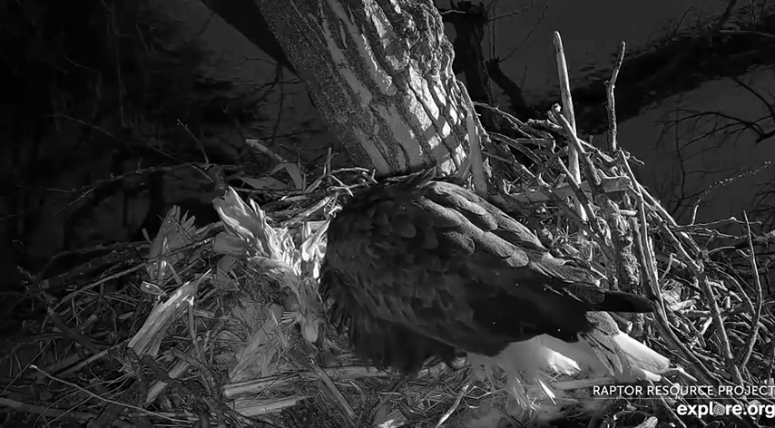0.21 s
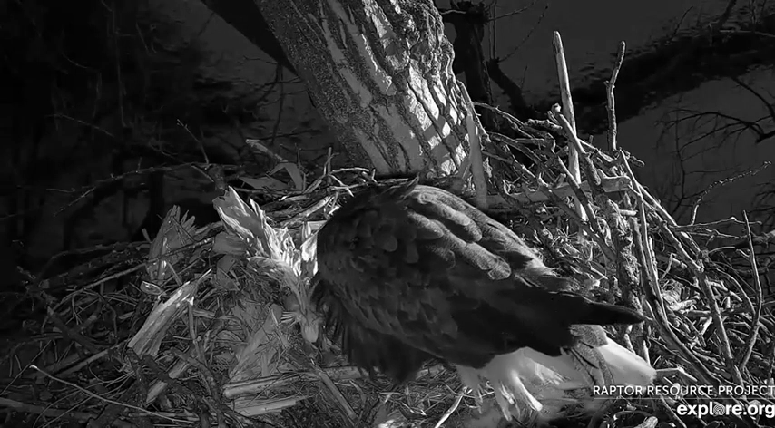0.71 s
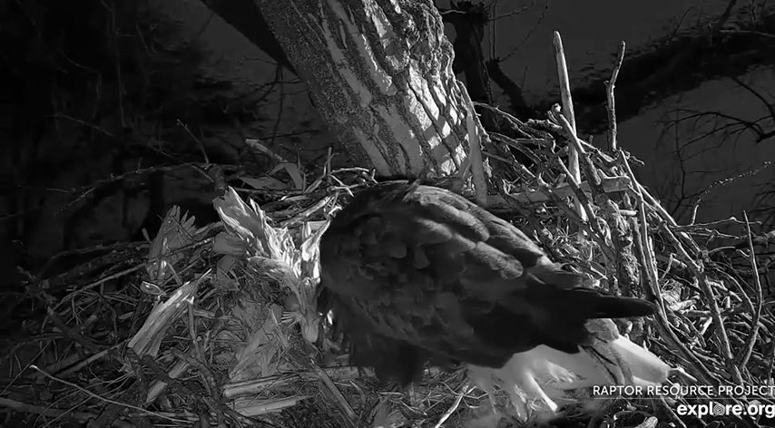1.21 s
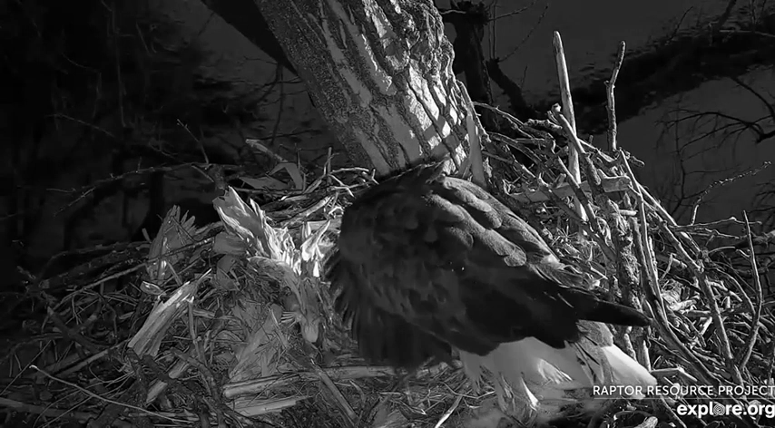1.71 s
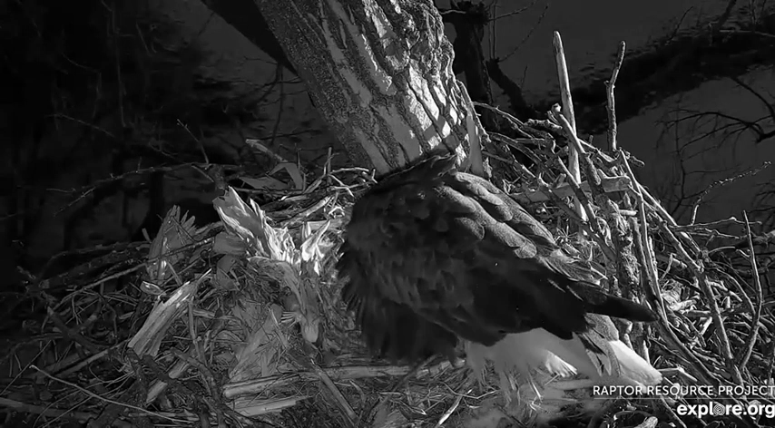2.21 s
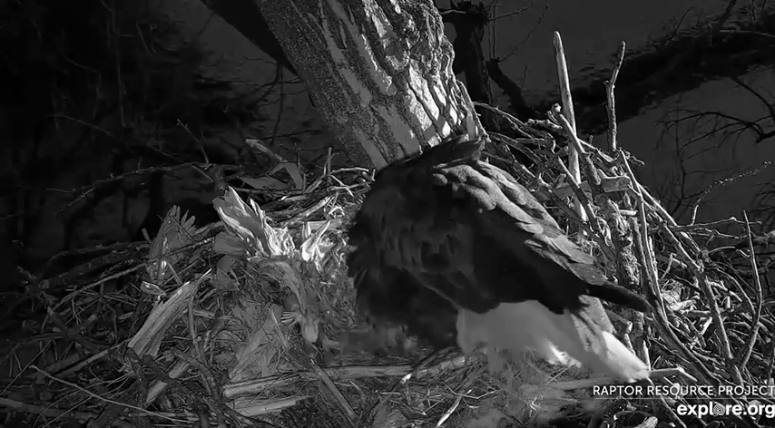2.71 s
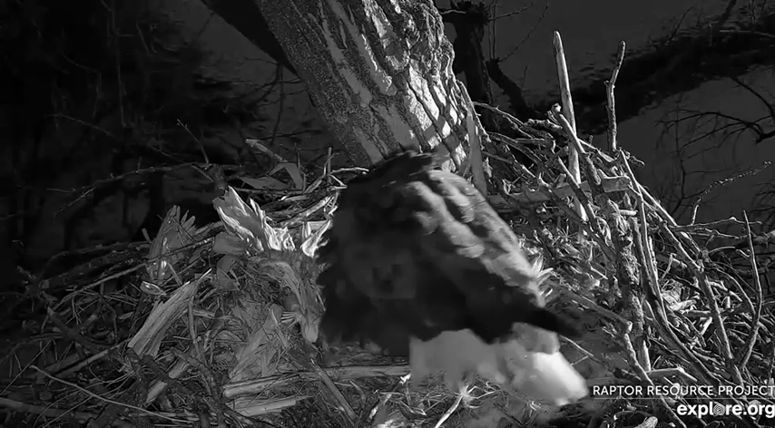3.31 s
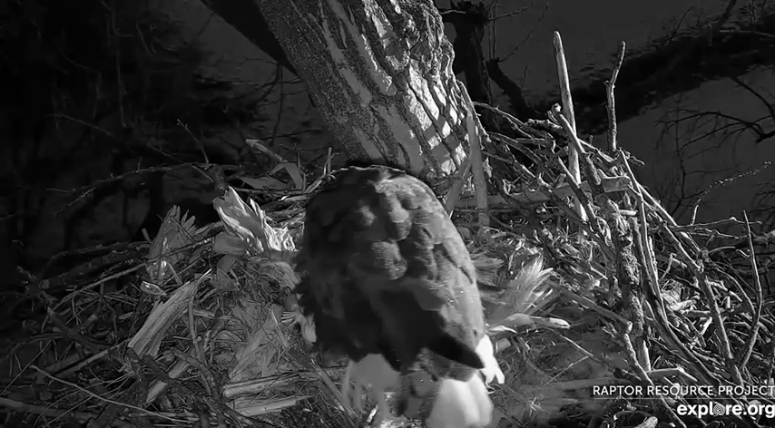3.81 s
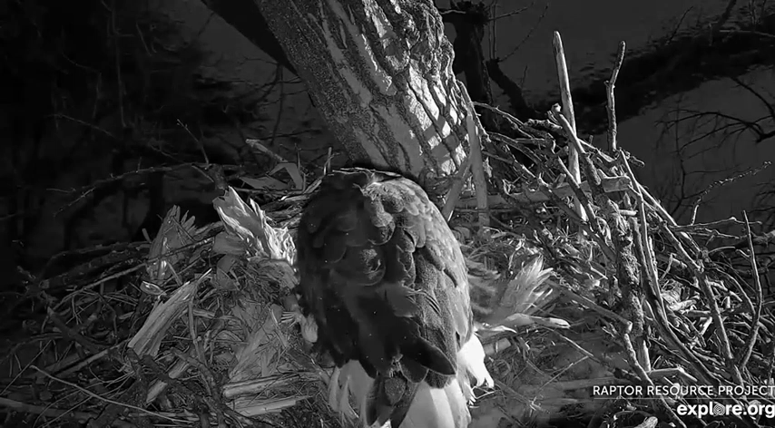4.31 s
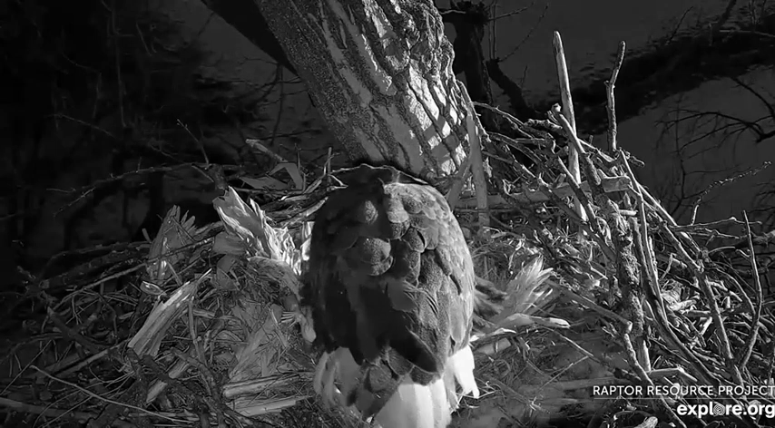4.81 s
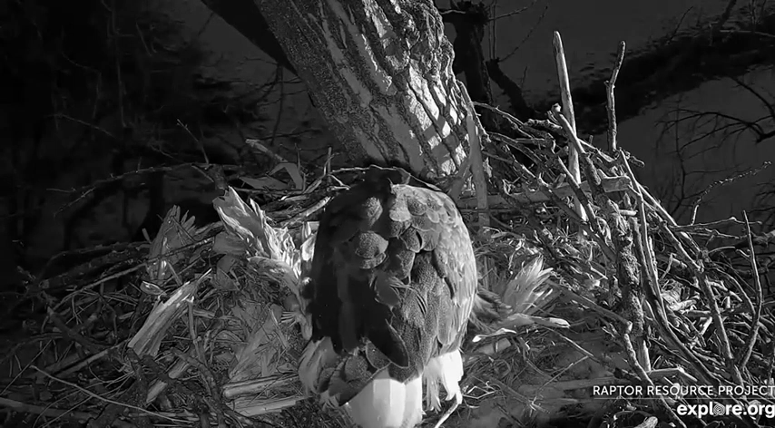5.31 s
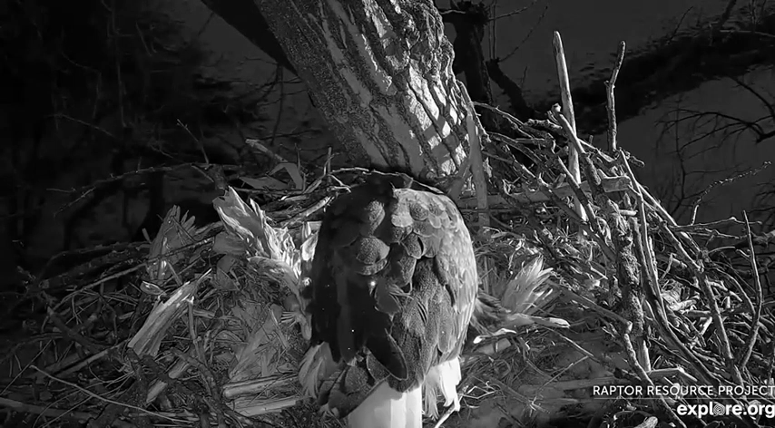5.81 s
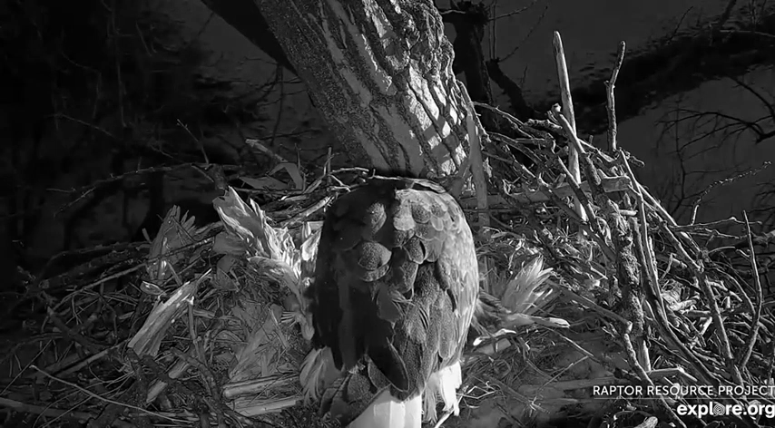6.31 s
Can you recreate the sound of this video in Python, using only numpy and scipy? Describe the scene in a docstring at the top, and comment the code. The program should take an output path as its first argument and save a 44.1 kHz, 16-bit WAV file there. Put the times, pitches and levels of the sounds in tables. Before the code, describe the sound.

A close eagle chitters in four bursts of high whistles, rasping squeals and falling yelps over steadily rushing water.

```python
"""An eagle chitters close by in four bursts of whistles, rasping squeals and falling yelps.
Its syrinx whistles, slapping membranes chop the tone and breath hisses through the windpipe.
The trees echo each note and running water rushes steadily below. Feathers flutter once, a twig
snaps and a foot thuds as the bird shifts on its nest; a small bird whistles far off."""
import sys
import numpy as np
from scipy import signal
from scipy.fft import rfft, irfft, next_fast_len
from scipy.io import wavfile
from scipy.ndimage import uniform_filter1d, map_coordinates

SR = 44100
rng = np.random.default_rng(int(sys.argv[2]) if len(sys.argv) > 2 else 0)


def generate_wav(sig):
    """Save sig (samples, or channels by samples) to the path in sys.argv[1] as 16-bit PCM at SR."""
    pcm = np.round(np.clip(np.atleast_2d(sig).T, -1, 1) * 32767).astype(np.int16)
    wavfile.write(sys.argv[1], SR, pcm)


N = 289737

CLEARING = 0.88  # share of rasp lost at full effort


def amp(db):
    """Decibels to gain."""
    return 10 ** (np.asarray(db) / 20)


def unit(x):
    """x at rms 1."""
    return x / np.sqrt(np.mean(x ** 2) + 1e-20)


def along(points, hz):
    """(hz, value) points read on a log frequency axis."""
    knots_hz, values = np.transpose(points)
    return np.interp(np.log(hz + 1), np.log(knots_hz + 1), values)


def wobble(rate_hz, size=N):
    """Smooth random curve, rate_hz knots a second."""
    knots = rng.standard_normal(int(size * rate_hz / SR) + 4)
    return map_coordinates(knots, [np.arange(size) * rate_hz / SR])


def filtered(x, response):
    """x through a frequency response."""
    size = next_fast_len(len(x) + 8192)
    return irfft(rfft(x, size) * response(np.fft.rfftfreq(size, 1 / SR)), size)[:len(x)]


def noise(spectrum, size=N):
    """Coloured noise, rms 1."""
    return unit(filtered(rng.standard_normal(size), lambda hz: amp(along(spectrum, hz))))


def add(track, start_s, sound):
    """Mix a sound into the track."""
    start = round(start_s * SR)
    part = sound[max(-start, 0):max(N - start, 0)]
    track[max(start, 0):][:len(part)] += part


def swell(t, at_s, half_width_s):
    """Round-topped bump, 0 to 1 and back."""
    return np.exp(-np.abs((t - at_s) / half_width_s) ** 3)


def ease(t, start_s, length_s):
    """Smooth step, 0 to 1."""
    return np.sin(np.pi / 2 * np.clip((t - start_s) / length_s, 0, 1)) ** 2


def water(level_db=-33, patchy_db=1.9):
    """Steady rush; its colour shifts in small patches as the current churns."""
    # rush spectrum: freq_hz, gain_db
    spectrum = [(15, -61), (25, -31), (64, -2), (96, -7.5), (173, -3.5), (303, -5.5), (371, -4), (757, 1),
                (1470, -4.5), (1890, -11.5), (3490, -23), (4620, -31.5), (5810, -38), (9660, -34),
                (11000, -50), (14300, -94), (22000, -120)]
    bins = signal.stft(noise(spectrum), nperseg=512)[2]
    patches = uniform_filter1d(rng.standard_normal(bins.shape), size=4, axis=0)
    patches = uniform_filter1d(patches, size=10, axis=1)
    rush = signal.istft(bins * amp(patchy_db * unit(patches)), nperseg=512)[1][:N]
    return amp(level_db) * unit(rush)


def woods(x, near_db=-15, near_t60_s=0.11, far_db=-17):
    """Quick scatter from trunk and nest, then a long tail from the trees."""
    # decay among the trees: freq_hz, t60_s
    decay = [(300, 0.58), (3300, 0.71), (6000, 0.49), (10000, 0.1)]
    hz, t, bins = signal.stft(rng.standard_normal(SR), SR, nperseg=256)
    far = signal.istft(bins * amp(-60 * t / along(decay, hz)[:, None]), SR, nperseg=256)[1][:SR]
    near = rng.standard_normal(SR) * amp(-60 * np.arange(SR) / SR / near_t60_s)
    echo = amp(near_db) * near / np.linalg.norm(near) + amp(far_db) * far / np.linalg.norm(far)
    return signal.fftconvolve(x, np.pad(echo, (SR // 200, 0)))[:N]


def far_bird():
    """Thin falling whistles, blurred by distance."""
    # chirps: start_s, length_s, from_hz, to_hz, level_db
    chirps = [(-.02, 0.06, 4100, 2860, -45), (1.278, 0.013, 2860, 2300, -40),
              (5.213, 0.059, 3830, 2850, -41.5), (5.728, 0.052, 3940, 2870, -44),
              (5.918, 0.055, 4220, 3050, -48.5)]
    out = np.zeros(N)
    for start_s, length_s, from_hz, to_hz, level_db in chirps:
        u = np.linspace(0, 1, int(length_s * SR))
        phase = 2 * np.pi * np.cumsum(from_hz * (to_hz / from_hz) ** u) / SR
        flicker_db = 3 * wobble(144, len(u))
        tone = np.sin(phase + 0.9 * wobble(396, len(u)))
        add(out, start_s, amp(level_db + flicker_db) * np.sin(np.pi * u) * tone)
    return out


def nest(snap_t60_s=0.015):
    """Straw crackles and a twig snaps underfoot."""
    # straw and twig spectrum: freq_hz, gain_db
    straw = [(1000, -12), (3500, 2.5), (5500, 7), (8500, -1.5), (11000, -18)]
    # rustle envelope: time_s, level_db
    rustle = [(2.2, -54.5), (2.72, -53.5), (2.82, -46.5), (2.93, -54), (3.4, -55)]
    # twig snap: start_s, level_db
    snaps = [(2.742, -27.5)]
    rustle_db = np.interp(np.arange(N) / SR, *np.transpose(rustle))
    out = amp(rustle_db) * unit(noise(straw) * amp(3.4 * wobble(300)))
    t = np.arange(SR // 20) / SR
    for start_s, level_db in snaps:
        add(out, start_s, amp(level_db - 60 * t / snap_t60_s) * noise(straw, len(t)))
    return out


def footfall(rise_s=0.011):
    """The packed nest thuds dully under a foot."""
    # thud: start_s, pitch_hz, level_db
    thuds = [(4.451, 309, -28)]
    out, t = np.zeros(N), np.arange(SR // 8) / SR
    envelope = t / rise_s * np.exp(1 - t / rise_s)
    for start_s, pitch_hz, level_db in thuds:
        tone = np.sin(2 * np.pi * pitch_hz * t + wobble(146, len(t)))
        add(out, start_s, amp(level_db) * envelope * tone)
    return out


def feathers(start_s=1.716, flicks=8, gap_s=0.0102, scatter_s=0.00092, puff_s=0.0024):
    """Quick run of flicks that swells and fades, each a puff of air."""
    # puff spectrum: freq_hz, gain_db
    spectrum = [(30, -22), (100, -1), (330, 17), (700, -12), (1800, -4), (3200, 0.5), (5000, -6.5),
                (10000, -33)]
    out, t = np.zeros(N), np.arange(SR // 50) / SR
    envelope = t / puff_s * np.exp(-2 * t / puff_s)
    for k, u in enumerate(np.linspace(0, 1, flicks)):
        level_db = -30.5 + 3.5 * np.sin(np.pi * u) - 8 * u
        at_s = start_s + k * gap_s + scatter_s * rng.standard_normal()
        add(out, at_s, amp(level_db) * unit(envelope * noise(spectrum, len(t))))
    return out


def windpipe(hz):
    """Complex response of the eagle's airway."""
    # airway resonances: centre_hz, width_hz, gain_db
    resonances = [(1950, 320, 6), (3370, 170, 5), (4310, 118, 14), (5300, 1600, 1), (5950, 210, 9),
                  (7340, 380, -3), (8700, 1300, -16)]
    response = 0
    for k, (centre_hz, width_hz, gain_db) in enumerate(resonances):
        damping = 1j * hz * width_hz
        response += (-1) ** k * amp(gain_db) * damping / (centre_hz ** 2 - hz ** 2 + damping)
    return response


def membrane_slap(depth, slap_hz=305.2, scatter=0.26):
    """Gain of membranes slapping shut unevenly; mean power unchanged."""
    rate_hz = slap_hz * (1 + scatter * wobble(slap_hz, len(depth)))
    return np.exp(depth * np.cos(2 * np.pi * np.cumsum(rate_hz) / SR)) / np.sqrt(np.i0(2 * depth))


def syrinx(pitch_hz, strength, rasp, edge_s=0.0013, rattle_hz=650, rattle_db=4, buzz_hz=860,
           throat_hz=7000):
    """One note: tone, bare octave, hiss envelope. Rasp shakes the pitch and chops the tone."""
    size = len(pitch_hz)
    t = np.arange(size) / SR
    rasp = np.clip(rasp, 0, 1)
    loudness = strength * ease(np.minimum(t, t[-1] - t), 0, edge_s)
    stagger = 0.07 * rasp ** 2 * wobble(200, size)
    jitter = (0.0063 + 0.035 * rasp) * wobble(1330, size)
    hz = pitch_hz * (1 + stagger + jitter)
    phase = 2 * np.pi * np.cumsum(hz) / SR
    depth = np.log(amp(rattle_db)) * np.sqrt(rasp)
    rattle = np.exp(depth * np.clip(wobble(rattle_hz, size), -2, 1.8) - 2 * depth ** 2)
    # a slower membrane vibration adds flickering sidebands
    buzz_phase = 2 * np.pi * np.cumsum(buzz_hz * (1 + 0.092 * wobble(213.5, size))) / SR
    sidebands = np.zeros(size)
    for k, share in [(-1, 0.4), (1, 0.55), (2, 0.28)]:
        throat_gain = 1 / (1 + ((hz + k * buzz_hz) / throat_hz) ** 10)
        flicker = amp(5 * wobble(156, size))
        sidebands += share * throat_gain * flicker * np.sin(phase + k * buzz_phase)
    tone = (np.sin(phase) + rasp * sidebands) / np.sqrt(1 + (rasp / 2) ** 2)
    octave = np.sin(2 * phase)
    overtones = amp(-16) * octave + amp(-17) * np.sin(3 * phase) * (3 * hz < SR / 2)
    tone += loudness * overtones  # overtones grow with loudness
    envelope = np.sqrt(2) * loudness * rattle
    hiss_envelope = amp(-7) * loudness * (0.05 + rasp)
    return envelope * tone, envelope * octave, hiss_envelope


def undertones():
    """Low rough glides under or just before a note."""
    # glides: start_s, length_s, from_hz, to_hz, level_db, rasp
    glides = [(1.579, .024, 2960, 3420, -36, 0.67), (1.932, 0.024, 3000, 3040, -30, 0.6),
              (3.624, 0.048, 2100, 2194, -32, .8), (6.135, 0.054, 2200, 1868, -28, .6)]
    for start_s, length_s, from_hz, to_hz, level_db, rasp in glides:
        u = np.linspace(0, 1, int(length_s * SR))
        pitch_hz = from_hz + (to_hz - from_hz) * u
        yield start_s, pitch_hz, amp(level_db) * np.sin(np.pi * u), np.full(len(u), rasp)


def whistles(attack_s=0.012, scoop=0.143, scoop_s=0.00797, glide_s=0.034):
    """Notes that scoop up, swell clear and mostly sink; overlaps use both sides of the syrinx."""
    # whistles: start_s, length_s, held_hz, end_hz, held_db, swell_at_s, half_width_s, swell_db, rasp
    notes = [ (0.435, 0.064, 4325, 3580, -19.5, 0.033, 0.0079, -6.5, 0.38),
             (.908, 0.027, 3350, 3430, -36.5, 0.011, 0.0037, -15.5, 0.7),
             (1.065, 0.019, 3530, 3230, -43, 0.017, 0.0032, -18, 0),
             (1.592, 0.096, 4070, 4010, -32.5, 0.015, 0.0059, -16, .4),
             (1.611, 0.072, 4080, 4060, -51, 0.015, 0.0041, -20.5, 0.1),
             (1.62, 0.041, 4780, 4610, -44, 0.026, .012, -31.5, 0.4),
             (1.945, 0.1, 4097, 4000, -33.5, 0.018, 0.0088, -16.5, 0.34),
             (1.999, 0.081, 4910, 4580, -34, 0.05, 0.0065, -22.5, .35),
             (2.055, .046, 4310, 4100, -34, .012, .008, -26, 0.5),
             (3.479, .057, 4280, 3830, -24, 0.024, 0.0068, -16.5, 0.27),
             (3.53, 0.031, 3430, 3410, -43, 0.026, 0.013, -24, .3),
             (3.626, 0.023, 4290, 4260, -25, 0.025, 0.0052, -30, 0.43),
             (3.740, .018, 3600, 3420, -33, .010, 0.0056, -23.5, 0.4),
             (3.978, .054, 4550, 4530, -24, 0.028, 0.0046, -9.5, 0.13),
             (6.004, 0.15, 4270, 4220, -21, 0.085, 0.011, -12, 0.25),
             (6.012, 0.017, 3480, 3550, -32, .014, 0.0054, -14, 0),
             (6.096, 0.039, 3430, 3490, -29, 0.014, .006, -17, .15),
             (6.300, 0.037, 3300, 3116, -27, .012, 0.0038, -12.5, 0.43),
             (6.398, 0.059, 4495, 4470, -25.5, 0.017, 0.0047, -16, 0.37)]
    for start_s, length_s, held_hz, end_hz, held_db, swell_at_s, half_width_s, swell_db, rasp in notes:
        t = np.arange(0, length_s, 1 / SR)
        effort = swell(t, swell_at_s, half_width_s)
        pitch_hz = held_hz * (1 - scoop * np.exp(-t / scoop_s))
        pitch_hz += (end_hz - held_hz) * ease(t, length_s - glide_s, glide_s)
        loudness = amp(held_db) * ease(t, 0, attack_s) * (1 - effort) + amp(swell_db) * effort
        yield start_s, pitch_hz, loudness, rasp * (1 - CLEARING * effort)


def squeals(leap_s=0.0044, fall_s=0.044, crack_hz=4662, crack_half_s=0.003, fade_db_per_s=39):
    """High, chopped notes that crack briefly into the register below, then fall."""
    # squeals: start_s, length_s, from_hz, held_hz, end_hz, level_db, crack_at_s, crack_db, rasp
    notes = [ (0.521, 0.073, 4046, 6380, 5960, -13.5, 0.023, -13, 0.45),
             (0.627, 0.1, 7680, 6090, 3050, -15.5, 0.012, -10, 0.45),
             (1.678, .056, 4400, 7650, 7200, -32.5, .002, -37, 0.3),
             (3.561, 0.051, 5500, 6900, 5660, -25.5, 0.031, -27.5, 0.8),
             (3.607, 0.064, 5770, 6500, 6100, -34.5, 0.043, -35, .8),
             (3.67, 0.094, 7220, 6110, 3360, -25, .008, -16.5, 0.7),
             (6.098, 0.037, 5400, 5400, 5330, -22.5, 0.054, -22, 0.65),
             (6.136, .054, 5730, 6920, 6600, -26, .042, -14.5, 1),
             (6.187, 0.13, 6560, 6600, 3400, -26.5, 0.00206, -22, 0.8)]
    for start_s, length_s, from_hz, held_hz, end_hz, level_db, crack_at_s, crack_db, rasp in notes:
        t = np.arange(0, length_s, 1 / SR)
        crack = swell(t, crack_at_s, crack_half_s)
        fall = ease(t, length_s - fall_s, fall_s)
        pitch_hz = held_hz + (from_hz - held_hz) * np.exp(-t / leap_s) + (end_hz - held_hz) * fall
        roughness = rasp * (pitch_hz / held_hz) ** 3  # clears as the pitch relaxes
        held = amp(level_db - fade_db_per_s * t) * ease(t, 0, leap_s)
        loudness = held * (1 - crack) + amp(crack_db) * crack
        screech = 0.046 * wobble(2200, len(t))
        waver = 0.04 * wobble(172, len(t))
        pitch_hz += (crack_hz - pitch_hz) * crack
        pitch_hz *= 1 + roughness * (screech + waver)
        yield start_s, pitch_hz, loudness * membrane_slap(0.82 * roughness), roughness


def yelps(dive_s=0.012, push_half_s=0.00682, flip_s=0.0074, sag_s=0.028, slack_hz=3278):
    """A dive into two clear pushes, a hoarse catch between; the tail sags as the syrinx slackens."""
    # yelps: start_s, length_s, dive_hz, dive_db, first_at_s, first_hz, first_db,
    # second_at_s, second_hz, second_db, tail_db, rasp
    notes = [ (0.778, 0.079, 6360, -11, 0.0169, 4430, -6, 0.045, 4480, -11.5, -28, 0.86),
             (0.904, 0.065, 6040, -27, .015, 4250, -10.5, 0.031, 4384, -4.5, -18.5, 0.63),
             (1.036, 0.052, 3600, -38, 0.011, 3330, -9.5, 0.025, 4387, -13, -20, 0.63),
             (1.169, 0.024, 4640, -45, 0.016, 3056, -7, 0.028, 3280, -7, -10.5, 0.32),
             (3.824, 0.072, 5194, -21, 0.019, 4560, -11.5, .034, 4710, -9.5, -20, 0.56),
             (3.975, .060, 3760, -15, 0.0168, 3414, -8.5, 0.028, 3585, -12.5, -16.5, 0.27),
             (4.126, .058, 3900, -27, 0.018, 3389, -8.5, 0.031, 3452, -6.5, -16.5, 0.2),
             (4.277, 0.034, 3420, -33, 0.015, 3220, -15, 0.032, 3320, -14.5, -22, 0.38),
             (6.389, .068, 5610, -25, 0.0119, 3480, -20, 0.037, 4563, -12, -29, 0.52),
             (6.542, 0.055, 3440, -23.5, 0.018, 3180, -19, 0.024, 3260, -15, -27, 0.63)]
    for (start_s, length_s, dive_hz, dive_db, first_at_s, first_hz, first_db,
         second_at_s, second_hz, second_db, tail_db, rasp) in notes:
        t = np.arange(0, length_s, 1 / SR)
        first, second = swell(t, first_at_s, push_half_s), swell(t, second_at_s, push_half_s)
        landed, sag = ease(t, 0, dive_s), ease(t, length_s - sag_s, sag_s)
        flip = ease(t, (first_at_s + second_at_s - flip_s) / 2, flip_s)
        push_hz = first_hz + (second_hz - first_hz) * flip
        pitch_hz = (dive_hz * (1 - landed) + push_hz * landed) * (1 - sag) + slack_hz * sag
        tail = amp(tail_db - 2.5 * np.sin(np.pi * sag) - 6.5 * sag)  # thins mid-slide, fades
        slides = amp(dive_db) * (1 - landed) + tail * landed
        loudness = np.max([slides, amp(first_db) * first, amp(second_db) * second], axis=0)
        settled = np.max([first, second, sag ** 4], axis=0)
        loudness *= membrane_slap(0.29 * (1 - settled))
        yield start_s, pitch_hz, loudness, rasp * (1 - CLEARING * settled)


def eagle(beam_db=-9, beam_top_hz=7300):
    """The calls heard from behind the bird, and the octave its beak beams into the trees."""
    voice, beam, breath = np.zeros((3, N))
    for gestures in (whistles(), squeals(), undertones(), yelps()):
        for start_s, pitch_hz, loudness, rasp in gestures:
            tone, octave, hiss_envelope = syrinx(pitch_hz, loudness, rasp)
            add(voice, start_s, tone)
            add(beam, start_s, octave)
            add(breath, start_s, hiss_envelope)
    beam = amp(beam_db) * filtered(beam, lambda hz: 1 / (1 + (hz / beam_top_hz) ** 20))
    hiss = breath * unit(filtered(rng.standard_normal(N), windpipe))
    return voice + hiss, beam


def scene():
    """Birds and nest among the trees, over the water."""
    calls, beam = eagle()
    birds = calls + feathers() + far_bird()
    return (birds + woods(birds + beam) + nest() + footfall() + water())[None]


def record(dry, ceiling=0.61, asymmetry=0.072, top_hz=10950):
    """The nest camera rounds off loud notes, adds faint mirror tones and limits the band."""
    # periodic converter timing error: rate_hz, slip_db (re one sample)
    clock_errors = [(3910, -9), (6450, -31), (10360, -23), (14270, -18)]
    rounded = dry[0] / (1 + np.abs(dry[0] / ceiling) ** 6) ** (1 / 6)
    rounded += asymmetry * rounded ** 2  # uneven overload: a soft bump under loud notes
    t = np.arange(N) / SR
    # early and late samples give sum and difference tones
    slip = sum(amp(db) * np.sin(2 * np.pi * hz * t + 0.27 * wobble(500)) for hz, db in clock_errors)
    sampled = rounded + slip * np.gradient(rounded)
    return filtered(sampled, lambda hz: 1 / np.sqrt(1 + (hz / top_hz) ** 130))[None]


dry = scene()
out = record(dry)
generate_wav(out)
```